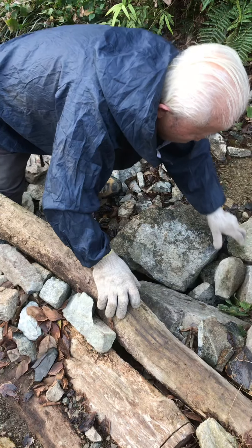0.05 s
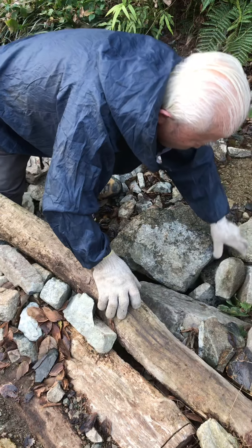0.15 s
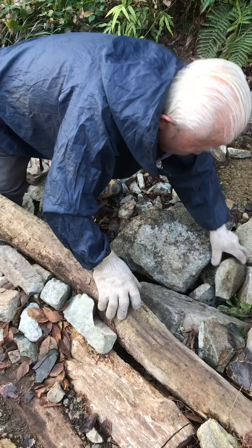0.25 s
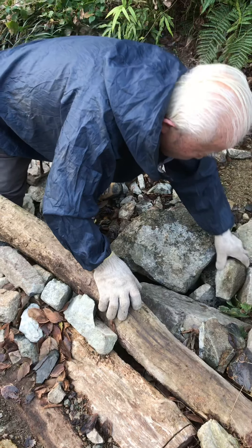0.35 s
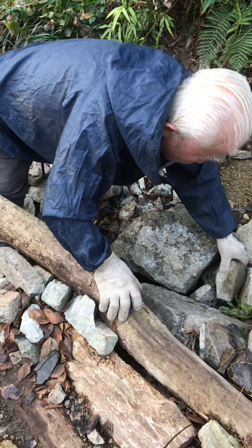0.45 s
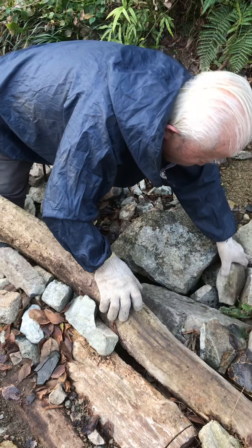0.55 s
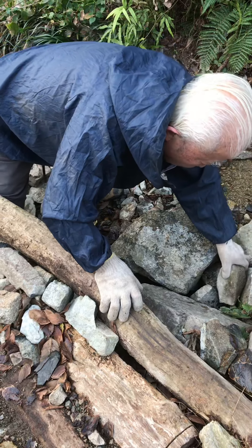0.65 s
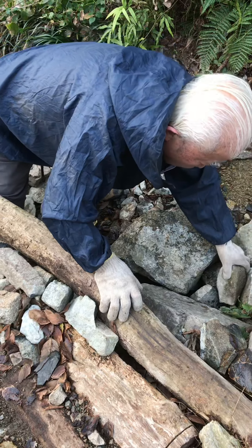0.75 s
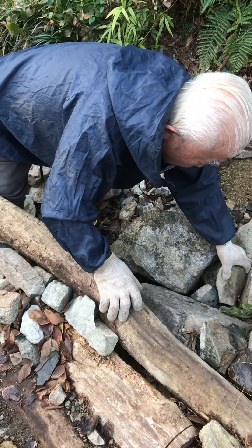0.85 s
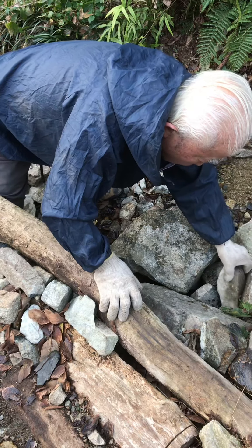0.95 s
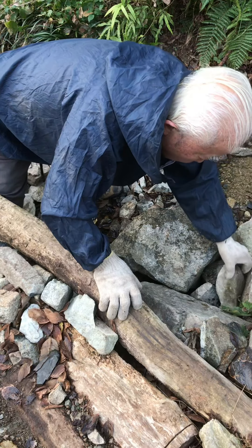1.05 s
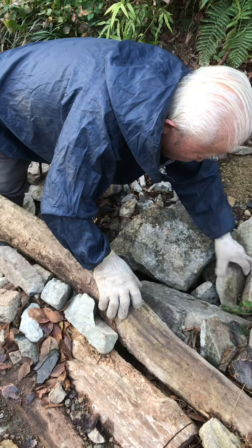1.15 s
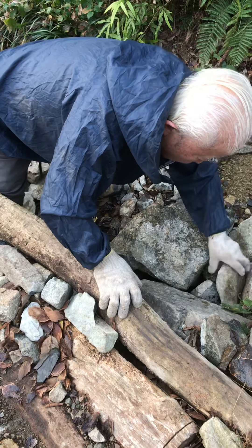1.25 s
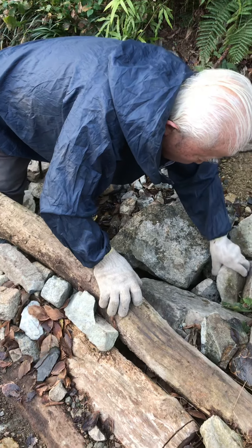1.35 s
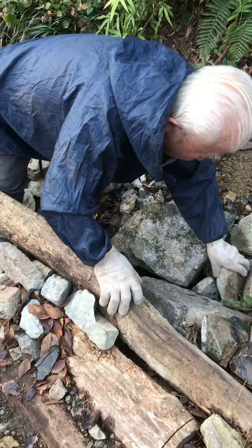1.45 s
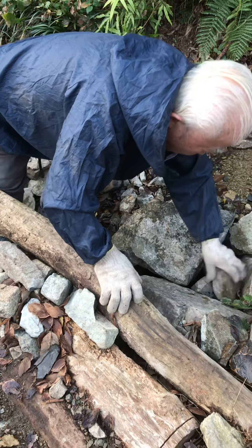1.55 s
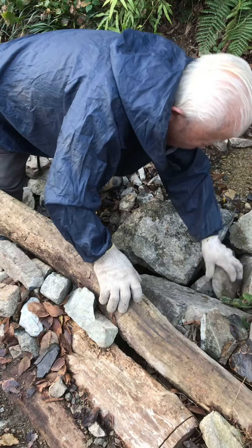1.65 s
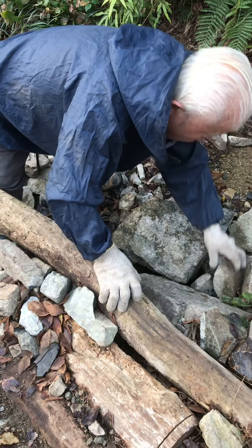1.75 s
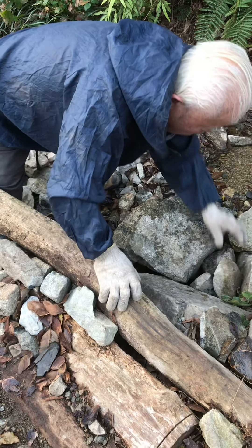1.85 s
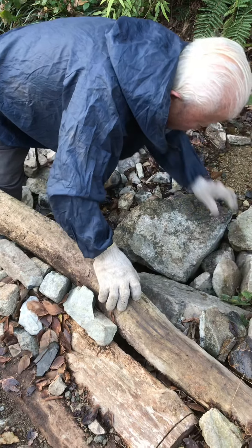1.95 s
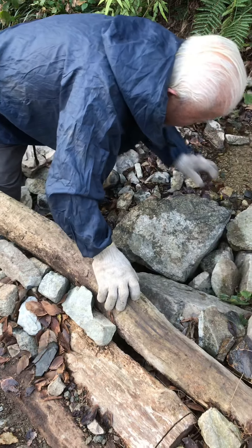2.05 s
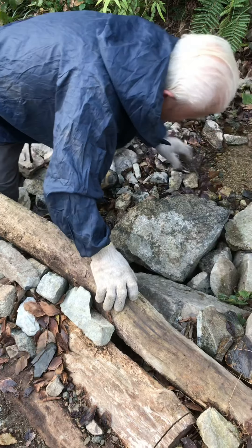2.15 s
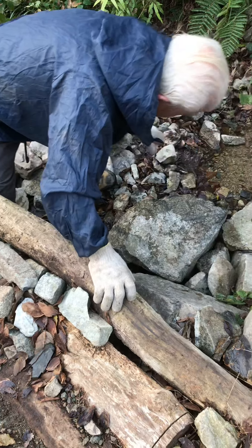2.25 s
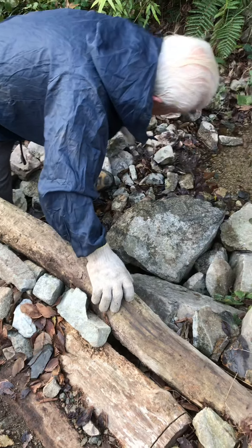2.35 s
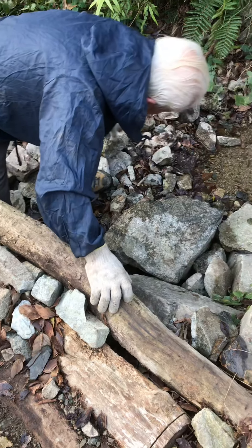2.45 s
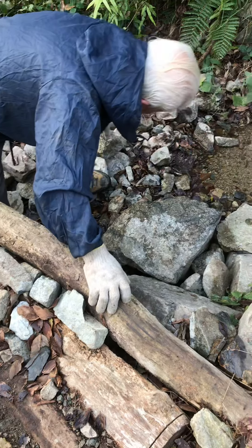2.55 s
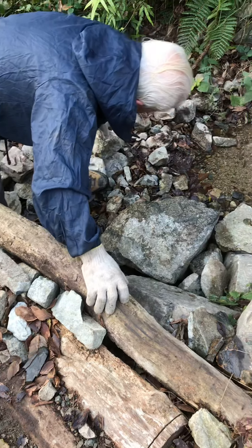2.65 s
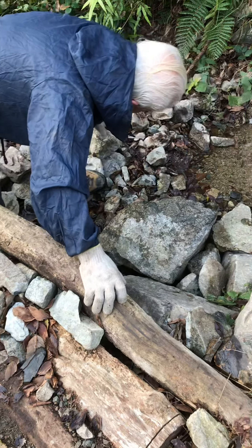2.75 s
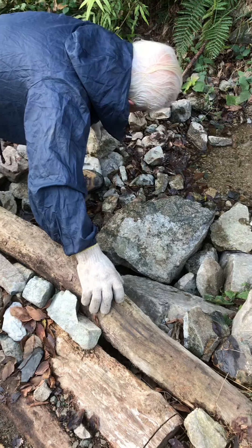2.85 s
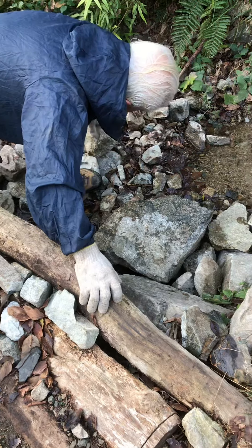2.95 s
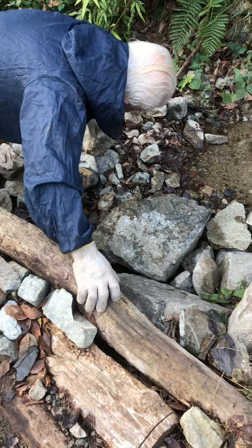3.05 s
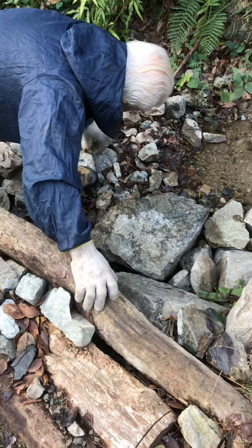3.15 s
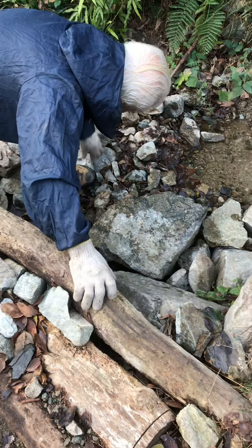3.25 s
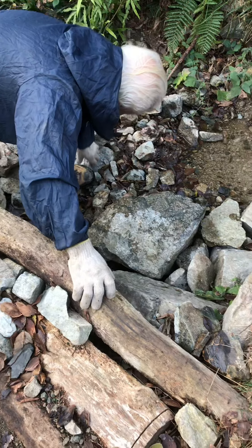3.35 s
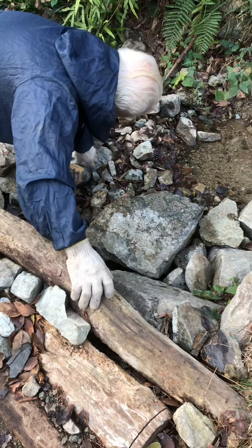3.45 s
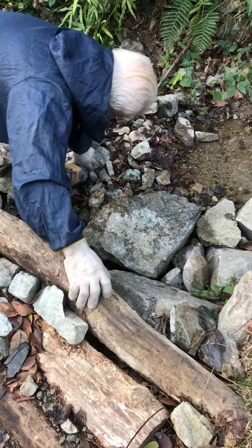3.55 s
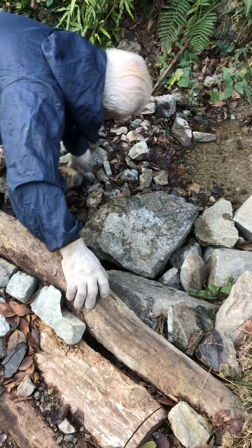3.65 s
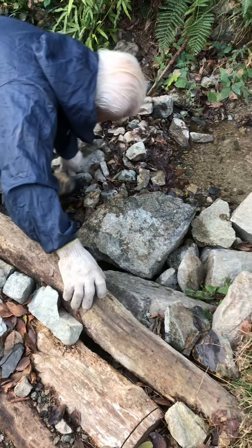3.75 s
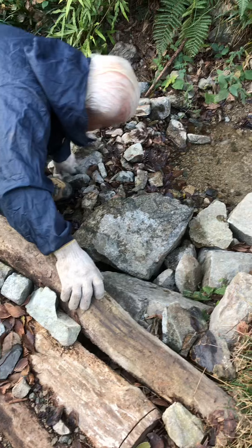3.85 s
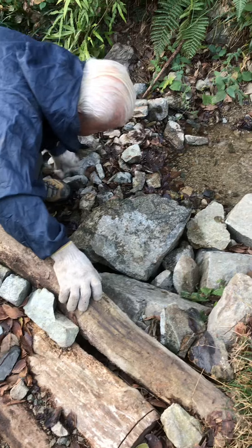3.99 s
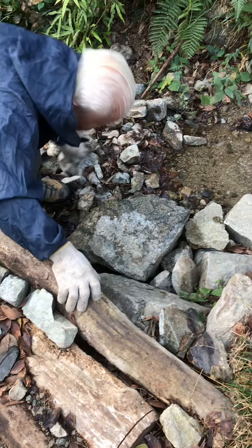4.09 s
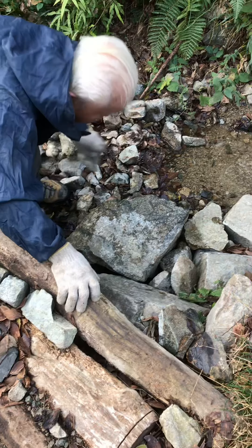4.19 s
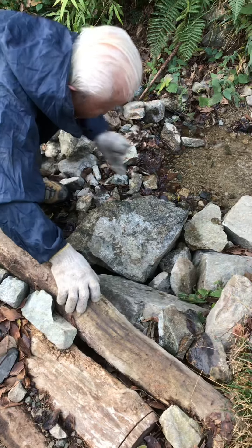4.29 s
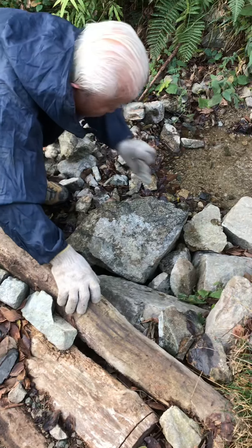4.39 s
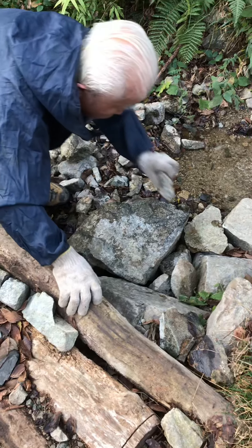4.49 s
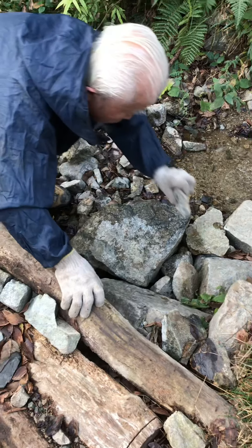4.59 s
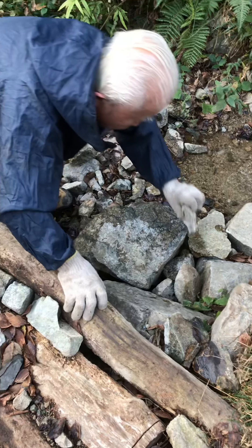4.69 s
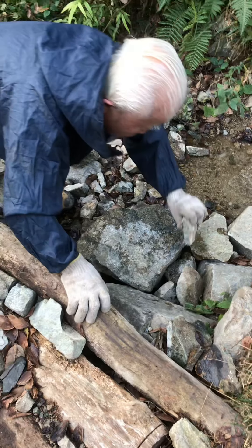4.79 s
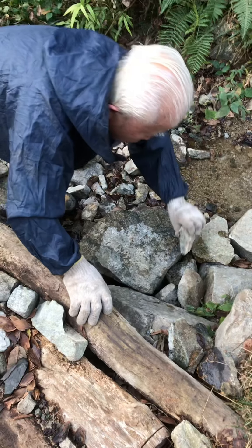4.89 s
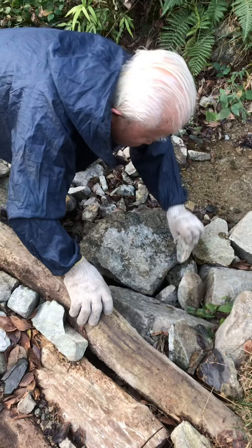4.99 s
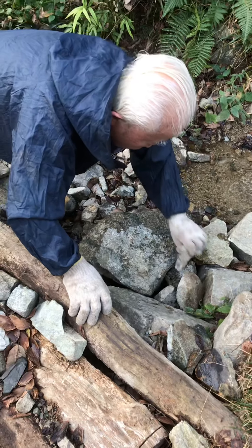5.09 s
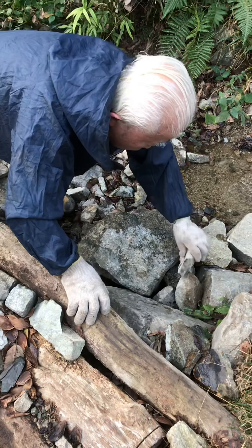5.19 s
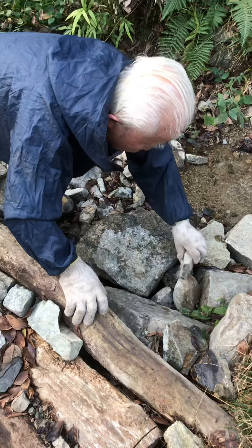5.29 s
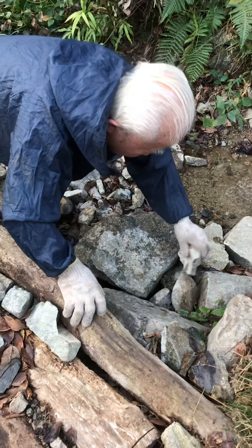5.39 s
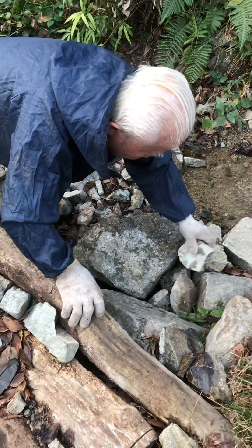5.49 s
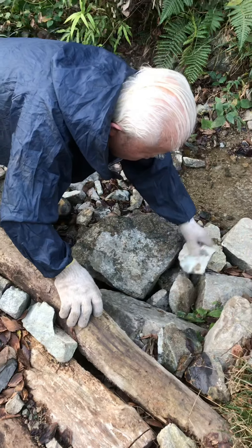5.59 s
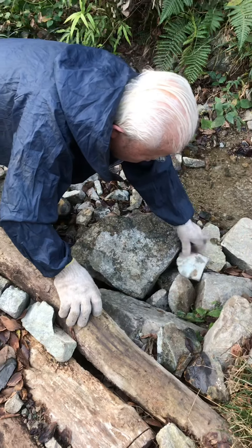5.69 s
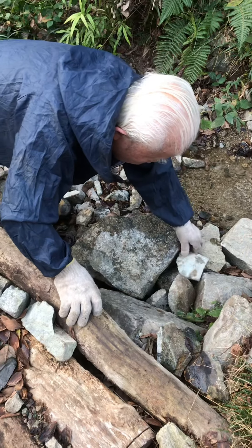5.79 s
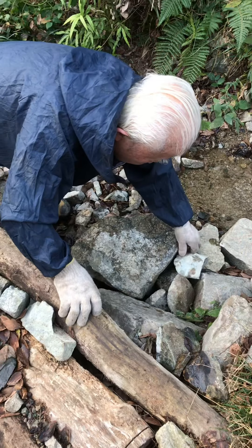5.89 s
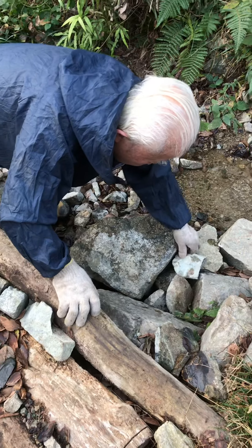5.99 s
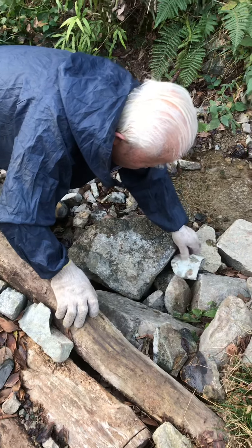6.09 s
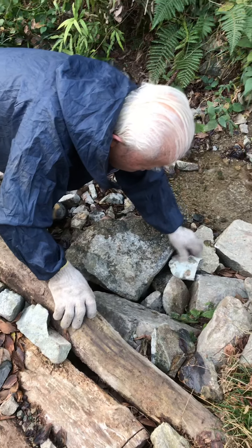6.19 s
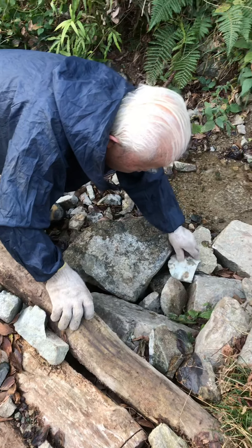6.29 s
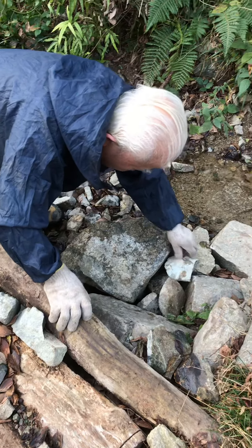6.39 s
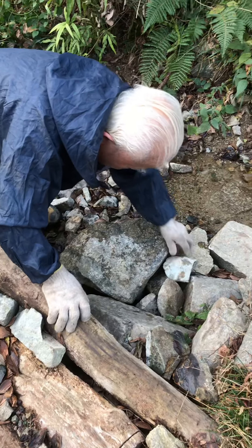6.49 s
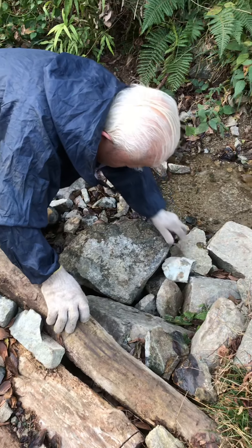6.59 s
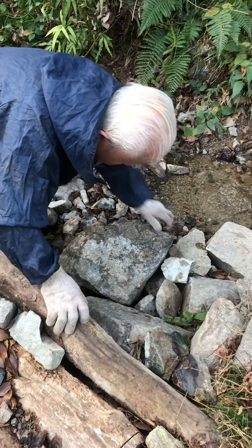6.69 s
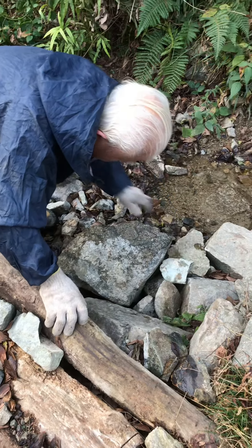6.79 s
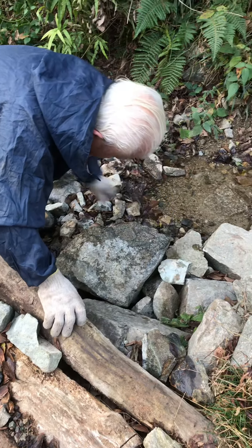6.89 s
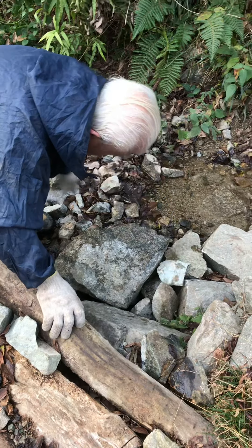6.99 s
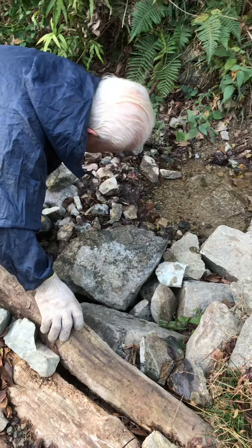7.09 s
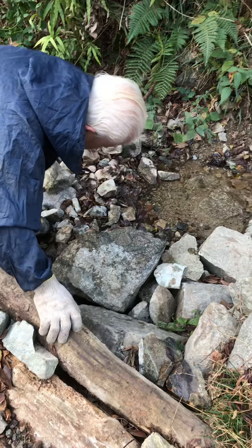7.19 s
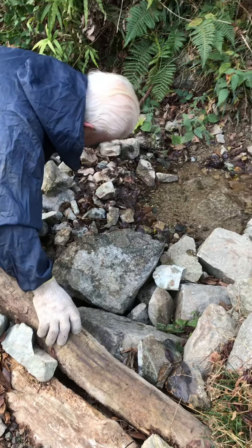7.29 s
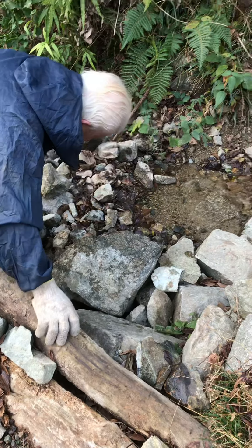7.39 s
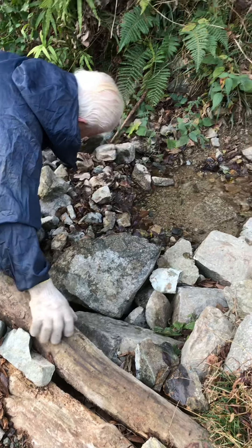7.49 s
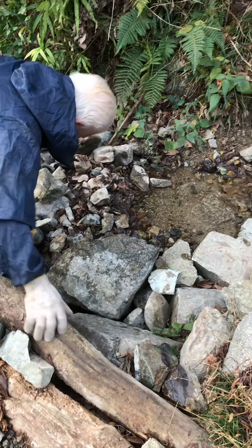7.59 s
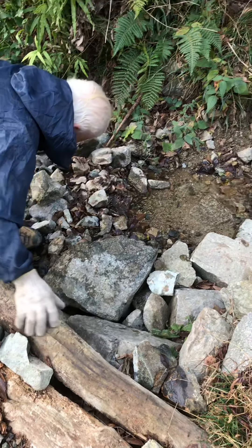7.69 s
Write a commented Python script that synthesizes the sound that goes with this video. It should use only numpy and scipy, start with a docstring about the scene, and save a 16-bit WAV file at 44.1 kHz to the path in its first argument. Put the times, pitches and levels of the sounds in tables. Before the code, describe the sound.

Close stones thud, scrape and click on a rock pile outdoors, while faint birds whistle over the soft wash of a stream.

```python
"""Stones shifted and stacked by hand on a rock pile, about a metre below a single microphone.
They knock, rock to rest and grate on grit; each blow thuds through the pile and rings its hollows.
Just as close, pebbles click and crunch, and a rain jacket swishes with the arm.
Farther off, small birds whistle rising notes that hang in the wooded bank; a quiet stream lies behind."""
import sys
import numpy as np
from scipy import signal
from scipy.fft import rfft, irfft
from scipy.io import wavfile
from scipy.ndimage import uniform_filter1d

SR = 44100
rng = np.random.default_rng(int(sys.argv[2]) if len(sys.argv) > 2 else 0)


def wrap_up_sound(samples):
    """Save the sound to the file named by the first command line argument, as 16-bit audio."""
    columns = np.atleast_2d(samples).T
    # keep every value between -1 and 1, then stretch to whole-number steps
    tamed = np.clip(columns, -1, 1)
    steps = np.round(tamed * 32767).astype(np.int16)
    wavfile.write(sys.argv[1], SR, steps)


N = 341334
TIME = np.arange(N) / SR
AGE = TIME[:SR // 4]  # time since a blow

# stone set on stone: t/s, thud level/dB, contact sharpness f/Hz, share of ping 0-1
STONE_BLOWS = [(0.445, -40.5, 850, 0.1), (0.4587, -32.5, 864, 0), (.477, -40.5, 900, 0.16),
               (.913, -39, 1370, 0.5), (0.969, -40, 1390, 0.2), (1.011, -39, 910, 0.1),
               (1.341, -52.5, 905, 0), (1.4435, -29.5, 805, 0.2), (1.4572, -32, 900, 0.3),
               (1.4775, -31, 1140, 0.4), (1.4923, -22.5, 1730, 0.07), (1.495, -14, 930, 0.03),
               (1.498, -22.5, 506, 0), (1.506, -25, 1400, 0), (1.641, -47, 800, 0),
               (1.656, -40.5, 960, 0.2), (1.698, -46.5, 910, 0), (3.638, -37, 1230, 0),
               (3.751, -36.5, 450, 0), (3.801, -37.5, 443, 0.1), (4.411, -47.5, 1450, 0),
               (5.0049, -21.5, 1620, 0.33), (5.603, -22, 1070, 0.32), (5.640, .5, 2530, 0),
               (5.6499, -15, 1730, 0.07), (5.672, -40.5, 1490, .4), (5.6809, -27.5, 930, 0.18),
               (5.8301, -31.5, 937, 0), (5.857, -37, 856, 0), (5.8829, -34.5, 800, 0.03),
               (5.906, -40.5, 700, 0.03), (6.3457, -27, 1224, 0), (6.381, -38.5, 792, 0.1),
               (6.433, -38, 950, 0.1), (6.493, -44.5, 720, 0.06), (6.530, -57, 660, 0.06)]
# heavily damped modes of the rocks: f/Hz, relative level/dB, t60/s
PILE_MODES = [(198.6, -25, 0.023), (306, -19.5, 0.019), (499, -11.5, 0.0052), (740, -11, 0.012),
              (967, -5, 0.017), (1330, -11, 0.0057), (1660, 0.5, 0.0028), (2340, -11.5, 0.016),
              (2952, -4.5, 0.0075), (3610, -9.5, 0.015), (4210, -15, 0.013)]
# longer ring of the hollows between the rocks: f/Hz, relative level/dB, t60/s
HOLLOW_MODES = [(268, -6, .11), (300, -6, .08), (575, -2, .07), (650, 0, .075), (750, -4, .06),
                (900, -2, .065), (1490, -8, .06)]
# modes of the small hard stone itself: f/Hz, relative level/dB, t60/s
PING_MODES = [(6300, -13, .025), (8050, -6, .012), (8420, -1, .022), (8760, 0, .055), (12550, -9, .025)]


def knocks():
    """A metre down, blows thud, ring the hollows and crush grit; a loosely held stone pings."""
    light_blow_db, hollow_loss_db_per_db = -36, 0.4649
    out = np.zeros(N)
    for s, db, contact_hz, ping_share in STONE_BLOWS:
        # a soft, heavy contact pushes for longer: more bass, no upper modes
        thud = butter(ring(PILE_MODES, spread=0.039), contact_hz, "low", order=3)
        thud = butter(thud, 0.2 * contact_hz, "high")
        thud = butter(thud, 1.8 * contact_hz, "low")
        thud = disperse(thud, corner_hz=560, turns=1.53)
        hollow = butter(ring(HOLLOW_MODES, spread=0.0031), 0.96 * contact_hz, "low", order=4)
        # harder blows put less of their strength into the hollows
        hollow_db = -5.5 - hollow_loss_db_per_db * (db - light_blow_db)
        grit = burst(t60=.01) + undb(-9) * burst(t60=.04)
        grit = butter(grit, [2500, 8000], "band", order=1)
        grit = butter(grit, 10500, "low", order=3)
        ping = ring(PING_MODES, spread=.002)
        body = peak(thud) + undb(hollow_db) * peak(hollow)
        edge = undb(-19.5) * peak(grit) + ping_share * peak(ping)
        add(out, s, undb(db) * (body + edge))
    return out


def ring(modes, spread):
    """Damped modes kicked together; each contact point shifts them a little."""
    shifts = 1 + spread * rng.standard_normal(len(modes))
    return sum(undb(db) * fade(AGE, t60) * np.cos(2 * np.pi * hz * shift * AGE)
               for shift, (hz, db, t60) in zip(shifts, modes))


def disperse(x, corner_hz, turns):
    """Sound winds between the rocks: the lows come a few ms late, so a clack falls in pitch."""
    hz = np.fft.rfftfreq(len(x), 1 / SR)
    lag_turns = turns * np.arctan(hz / corner_hz) / (np.pi / 2)
    return irfft(rfft(x) * np.exp(-2j * np.pi * lag_turns), len(x))


# loose pebbles clicking on the pile: t/s, relative level/dB, centre f/Hz
PEBBLE_CLICKS = [(.036, -47, 5700), (.049, -47.5, 6860), (.351, -45, 7600), (1.137, -53, 3070),
                 (1.641, -57, 8000), (3.344, -40.5, 4770), (3.576, -47.5, 1400), (3.748, -39, 1920),
                 (3.753, -34, 1960), (3.765, -43, 1600), (3.8451, -36.5, 1690), (3.854, -42, 1680),
                 (3.895, -47, 1360), (3.9402, -47, 1120), (3.9602, -43, 1250), (4.58, -42.5, 1940),
                 (4.608, -49, 2270), (4.633, -44, 1980), (5.854, -41.5, 1985), (6.279, -49, 2200),
                 (6.290, -47, 2450), (6.3688, -34, 9830), (6.403, -40, 2290), (7.041, -41, 6340),
                 (7.574, -49, 2490), (7.616, -48.5, 1180), (7.629, -44.5, 1410)]


def pebbles():
    """Light stones give a dry click, higher for smaller ones, and chatter on their neighbours."""
    out = np.zeros(N)
    for s, db, hz in PEBBLE_CLICKS:
        chatter_s = .028 * np.sqrt(2000 / hz)  # larger pebbles rattle for longer
        contact = burst(t60=.006) + undb(-10) * burst(t60=chatter_s)
        body = butter(contact, [hz / 1.45, hz * 1.45], "band")
        edge = butter(contact, hz, "high")
        add(out, s, undb(db + 3) * (peak(body) + undb(-17) * peak(edge)))
    return out


# heavy stone dragged over its bed: fastest at t/s, length/s, relative level/dB
STONE_DRAGS = [(.9, 0.27, -55), (1.012, 0.089, -48.5), (1.495, 0.15, -41.5)]
# spectrum of the grit under it: f/Hz, relative level/dB
GRIT_SPECTRUM = [(100, 6), (280, 14), (600, 8.5), (950, 4), (1500, -8), (2200, -3), (5000, -65),
                 (16000, -37)]


def grating():
    """A dragged stone sticks and slips on grit."""
    slips = colour(grains(per_s=3000, spread_db=-1), GRIT_SPECTRUM)
    return slips * strokes(STONE_DRAGS) * undb(-0.5 + 2 * walk(60.95))


# hand raking through pebbles: fastest at t/s, length/s, level/dB
HAND_RAKES = [(3.6, 0.56, -56.5), (3.74, 0.27, -50.5), (3.9, 0.27, -54.5), (7.63, 0.066, -56.5)]
# spectrum of the crunch: f/Hz, relative level/dB
GRAVEL_SPECTRUM = [(120, -13), (300, 6.5), (550, -4), (780, 7), (1020, 9), (1250, -5), (1600, -4),
                   (2200, -8), (3000, -16), (6000, -14), (16000, -51)]


def raking():
    """Pebbles catch and crunch under the hand."""
    crunch = colour(grains(per_s=1300, spread_db=0.9), GRAVEL_SPECTRUM)
    return crunch * strokes(HAND_RAKES) * undb(1.3 * walk(60))


# arm movements that swish the sleeve: fastest at t/s, length/s, level/dB
ARM_MOVES = [(.33, 0.29, -64.5), (.47, 0.15, -62), (.6, 0.1, -68.5), (.78, 0.25, -60), (.89, 0.26, -52),
             (1.01, 0.091, -50), (1.27, 0.11, -67), (1.355, 0.13, -59.5), (1.5, 0.18, -45.5),
             (1.645, .15, -55.5), (3.42, .12, -64), (3.58, 0.18, -52), (3.672, 0.12, -44),
             (3.745, 0.084, -52.5), (3.955, 0.13, -56.5), (4.47, 0.66, -69.5), (5.16, 0.3, -64),
             (5.58, 0.42, -67.5), (5.86, 0.23, -63.5), (6.29, 0.1, -63), (6.385, 0.12, -61.5),
             (6.65, 0.19, -65.5), (7.63, 0.062, -59)]
# spectrum of the rubbing cloth: f/Hz, relative level/dB
CLOTH_SPECTRUM = [(200, -7.5), (1000, -6), (2500, -4), (4500, -1.5), (8000, -0.5), (10500, -5),
                  (13000, -2.5), (16000, -11)]


def jacket():
    """Close to the microphone, a rain jacket swishes and crinkles with the arm, never quite still."""
    swish = unit(grains(per_s=9000, spread_db=2))
    crinkle = undb(-2) * unit(grains(per_s=300, spread_db=2))
    rest_db = -77.5
    motion = np.hypot(strokes(ARM_MOVES), undb(rest_db))
    folds_db = 2 * walk(90)
    return colour(swish + crinkle, CLOTH_SPECTRUM) * motion * undb(folds_db)


def strokes(moves):
    """Gain of a run of hand movements: each speeds up to its peak and slows again."""
    edge_drop_db, shape = 18, 1.29  # shape: 1 = pointed, 2 = rounded
    power = 0
    for s, length, db in moves:
        from_peak = np.minimum(np.abs(TIME - s) / (length / 2), 10)
        power += undb(db - edge_drop_db * from_peak ** shape) ** 2
    return np.sqrt(power)


def bank(x):
    """Nearby boulders scatter the sound within milliseconds; the bank adds a faint dull tail."""
    near = butter(burst(t60=0.047) * (AGE > .003), 3900, "low", order=1)
    far = butter(burst(t60=0.4) * (AGE > .015), 3000, "low", order=1)
    echoes = undb(-17) * near / np.linalg.norm(near) + undb(-40.5) * far / np.linalg.norm(far)
    return x + signal.fftconvolve(x, echoes)[:N]


# one bird's repeated rising whistle: t/s, top f/Hz, relative level/dB, rasp 0-1
RISING_NOTES = [(.715, 4620, -64.5, 0.9), (1.828, 4557, -50, 0.19), (2.095, 5570, -54.5, 0.24),
                (2.385, 4050, -69.5, 0.6), (2.905, 4790, -55.5, 1), (2.924, 6120, -66, 0.96),
                (3.424, 4340, -58, 0.4), (4.066, 3988, -52, 0.06), (4.38, 4310, -48.5, 0.52),
                (4.41, 4940, -55.5, 0.2), (5.102, 6180, -50, 0.85), (5.452, 6460, -50, 0.4),
                (5.757, 6065, -52, .25), (6.028, 6070, -52, 0.34), (6.288, 6060, -53.5, .25),
                (6.548, 6120, -52, 0.23), (6.849, 6070, -53, 0.34), (7.30, 5010, -70.5, 0.62)]
# slurs of other birds: t/s, length/s, start f/Hz, end f/Hz, relative level/dB, rasp 0-1
SLURRED_NOTES = [(2.604, .1, 3400, 3500, -67, 0.5), (4.225, .3, 2450, 2850, -60, 1),
                 (4.69, .059, 2410, 2710, -57.5, 0.86), (4.885, .098, 2450, 2450, -51.5, 0.24),
                 (5.097, .095, 2600, 2024, -50, 0.7), (5.214, .05, 4880, 3300, -53.5, 0.9),
                 (5.275, .046, 3245, 2960, -45.5, 0.16), (5.361, .063, 1880, 1750, -61, 0.2),
                 (5.499, .068, 2465, 2760, -49.5, 0), (5.537, .055, 2754, 2430, -50.5, 0.2),
                 (6.219, .045, 3490, 3565, -52, .24), (6.706, .085, 3046, 3717, -49, 0),
                 (7.407, .03, 5110, 4300, -55, 1)]


def birds():
    """On the bank one bird repeats a rise and others slur lower notes; quick pitch flutter rasps."""
    song = np.zeros(N)
    waver, flutter = .014 * walk(70), .035 * walk(1100)

    def wobble(s, rasp):
        return (waver + rasp * flutter)[int(s * SR):]

    for s, top_hz, db, rasp in RISING_NOTES:
        foot_hz = 2360 + 0.14 * top_hz
        length = .078 + (top_hz - foot_hz) / 53000  # a wider rise takes longer
        add(song, s, undb(db) * whistle(length, foot_hz, top_hz, wobble(s, rasp), fade_db=4))
    for s, length, start_hz, end_hz, db, rasp in SLURRED_NOTES:
        add(song, s, undb(db) * whistle(length, start_hz, end_hz, wobble(s, rasp), fade_db=2))
    return song


def whistle(length, start_hz, end_hz, wobble, fade_db):
    """One note, softening as it goes: a rise leaps, then levels off; a fall is even."""
    progress = np.linspace(0, 1, int(length * SR))
    span_hz = end_hz - start_hz
    arch = min(4600 / max(span_hz, 1), 3.5)  # a narrower rise levels off sooner
    glide = np.expm1(-arch * progress) / np.expm1(-arch) if span_hz > 0 else progress
    hz = (start_hz + span_hz * glide) * (1 + wobble[:len(progress)])
    phase = 2 * np.pi * np.cumsum(hz) / SR
    envelope = undb(fade_db * (.5 - progress)) * np.abs(np.sin(np.pi * progress)) ** .5
    return envelope * (np.sin(phase) + undb(-27.5) * np.sin(2 * phase))


def trees(song):
    """Leaves and twigs scatter the song into a long tail, the high notes more than the low."""
    t = TIME[:SR]
    decay = fade(t, t60=0.73) + 0.43 * fade(t, t60=0.15)
    tail = butter(rng.standard_normal(SR) * decay, 3200, "high")
    scattered = signal.fftconvolve(song, tail / np.linalg.norm(tail))[:N]
    return undb(-4.5) * song + undb(-0.93) * scattered


def far_birds():
    """Deep in the wood, song blurs into a faint narrow band that wavers in level."""
    centre_hz, level_db = 3696, -77
    band = butter(rng.standard_normal(N), [centre_hz / 1.13, centre_hz * 1.13], "band")
    return unit(band) * undb(level_db + 1.5 * walk(6))


# spectrum of the water and the outdoor rumble: f/Hz, relative level/dB
STREAM_SPECTRUM = [(12, -49), (20, -16), (58, -0.5), (107, -9.5), (130, -14.5), (234, -17), (337, -21.5),
                   (367, -18.5), (399, -24), (574, -28), (660, -29), (2200, -34), (4670, -37), (7110, -42),
                   (16000, -49)]


def stream():
    """Beside the pile, a faint even wash of water over a low outdoor rumble that swells and sinks."""
    air = colour(rng.standard_normal(N), STREAM_SPECTRUM)
    air = undb(-56) * butter(air, 30, "high", order=3)
    rumble = butter(air, 180, "low", order=1)
    wash = air - rumble
    return rumble * undb(2.1 * walk(9)) + wash * undb(-1.14 + 0.34 * walk(5))


def undb(db):
    """Decibels to gain."""
    return 10 ** (np.asarray(db) / 20)


def unit(x):
    """Scale to rms 1."""
    return x / np.std(x)


def peak(x):
    """Scale to peak 1."""
    return x / np.abs(x).max()


def fade(t, t60):
    """Exponential decay, 60 dB down after t60."""
    return np.exp(-np.log(1000) * t / t60)


def butter(x, hz, kind, order=2):
    """Causal low-, high- or band-pass."""
    return signal.sosfilt(signal.butter(order, np.minimum(hz, SR / 2 - 1), kind, fs=SR, output="sos"), x)


def colour(x, points):
    """Shape the spectrum of x by (f/Hz, level/dB) points, at rms 1."""
    hz, db = np.transpose(points)
    bins = np.maximum(np.fft.rfftfreq(len(x), 1 / SR), 1)
    gain = undb(np.interp(np.log(bins), np.log(hz), db))
    return unit(irfft(rfft(x) * gain, len(x)))


def walk(per_s):
    """Smooth random wandering of spread 1."""
    hold = int(SR / per_s)
    steps = np.repeat(rng.standard_normal(N // hold + 1), hold)
    return unit(uniform_filter1d(steps, hold)[:N])


def burst(t60):
    """Noise that dies away."""
    return rng.standard_normal(len(AGE)) * fade(AGE, t60)


def grains(per_s, spread_db):
    """Dense tiny slips of uneven size."""
    slips = (rng.random(N) < per_s / SR) * rng.standard_normal(N)
    return slips * undb(spread_db * np.minimum(rng.exponential(size=N), 4))


def add(track, s, sound):
    """Mix a sound in at time s."""
    i = max(int(s * SR), 0)
    track[i:i + len(sound)] += sound[:N - i]


def scene():
    """Stones and jacket close to the microphone, birds and stream around them, in mono."""
    close = bank(knocks() + pebbles()) + grating() + raking() + jacket()
    return (close + trees(birds()) + far_birds() + stream())[None]


def record(dry):
    """The microphone clips at full scale and cuts the top."""
    top_hz = 15850
    top_cut = signal.ellip(10, .2, 70, top_hz, fs=SR, output="sos")
    return signal.sosfilt(top_cut, np.clip(dry, -1, 1))


dry = scene()
out = record(dry)
wrap_up_sound(out)
```